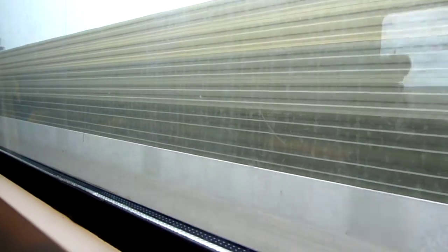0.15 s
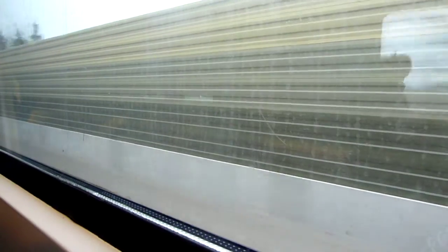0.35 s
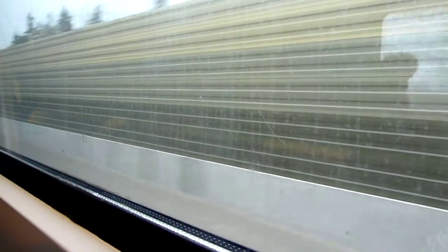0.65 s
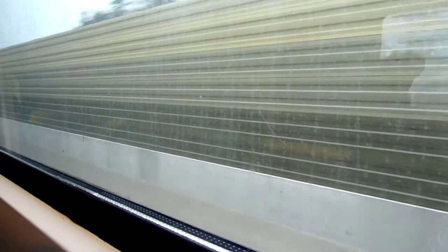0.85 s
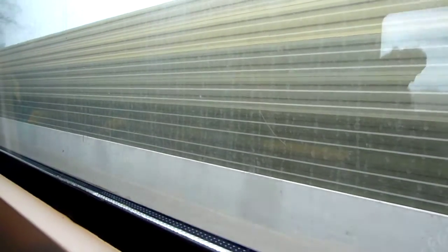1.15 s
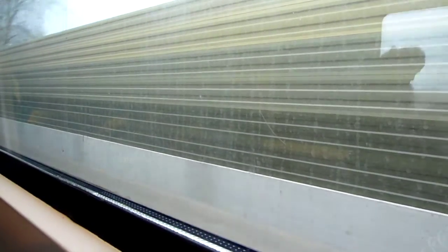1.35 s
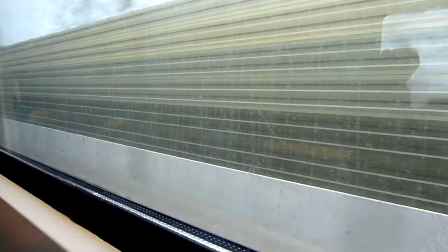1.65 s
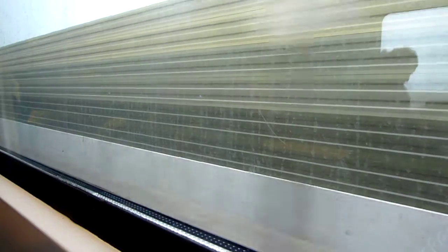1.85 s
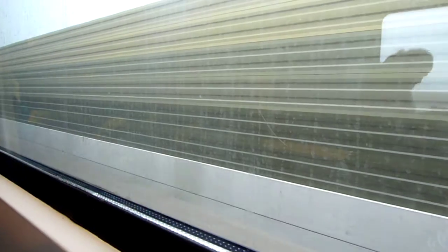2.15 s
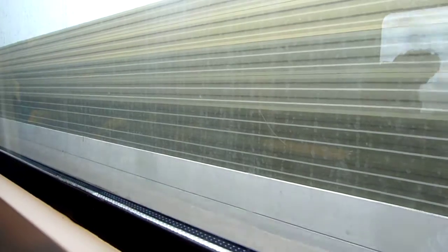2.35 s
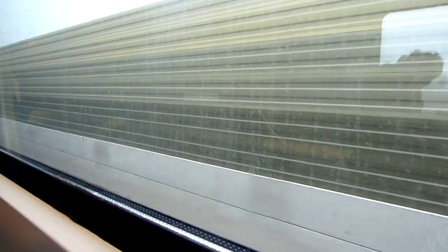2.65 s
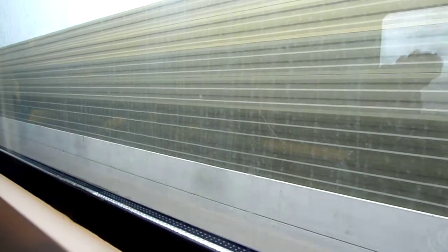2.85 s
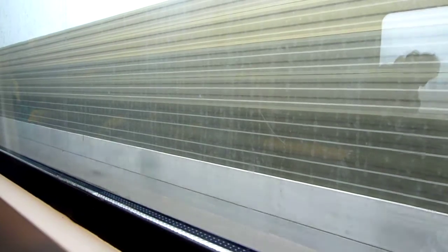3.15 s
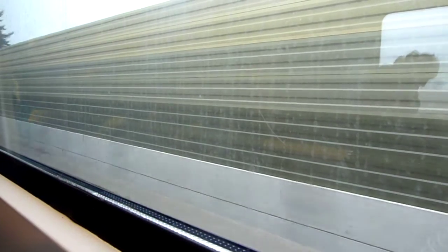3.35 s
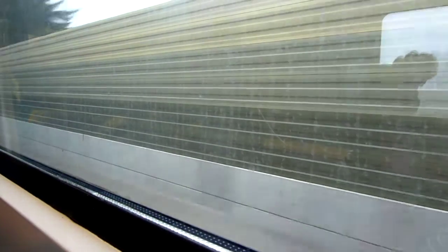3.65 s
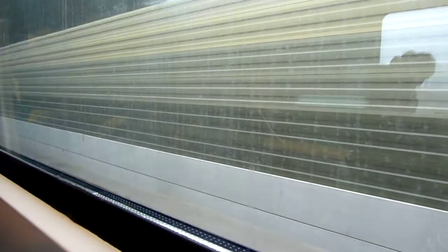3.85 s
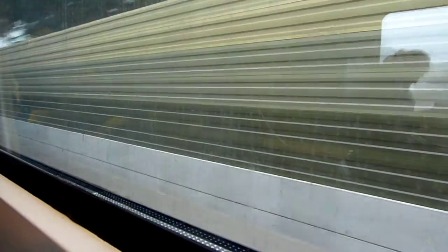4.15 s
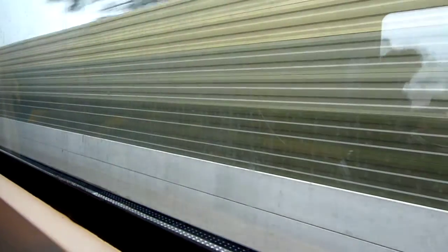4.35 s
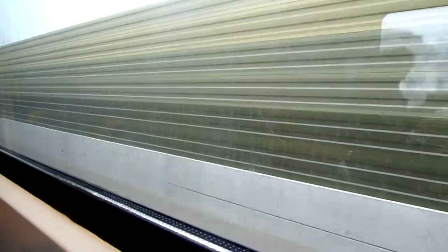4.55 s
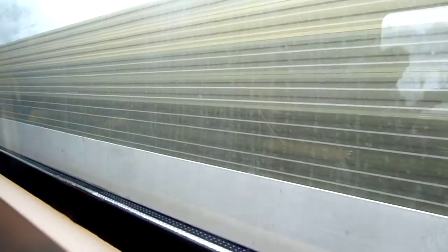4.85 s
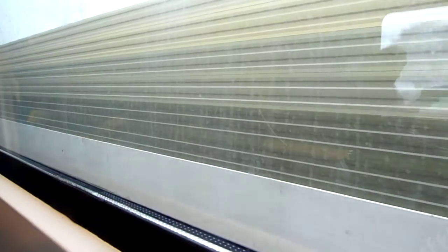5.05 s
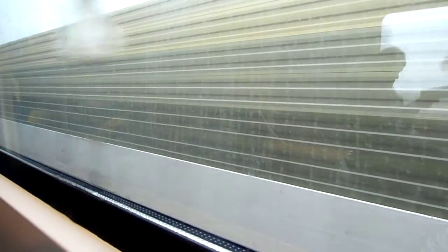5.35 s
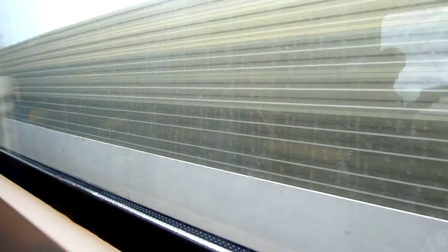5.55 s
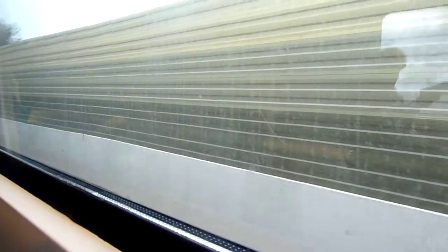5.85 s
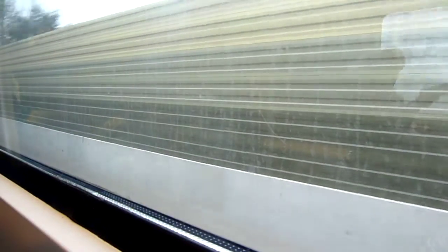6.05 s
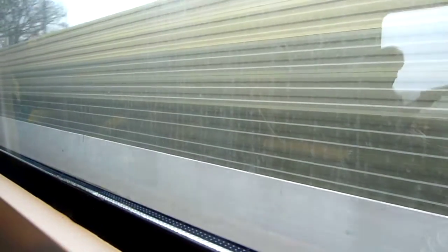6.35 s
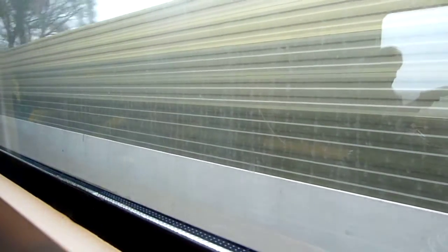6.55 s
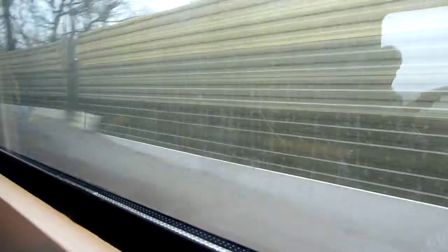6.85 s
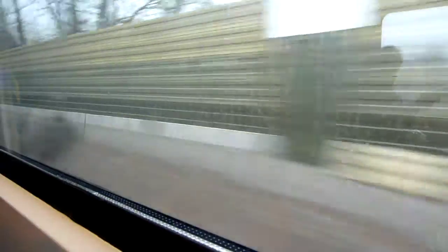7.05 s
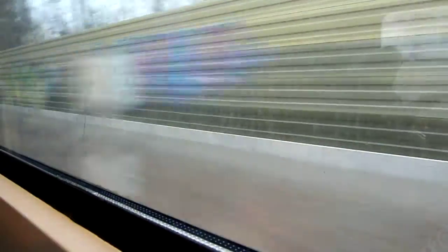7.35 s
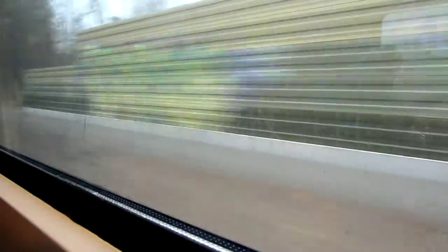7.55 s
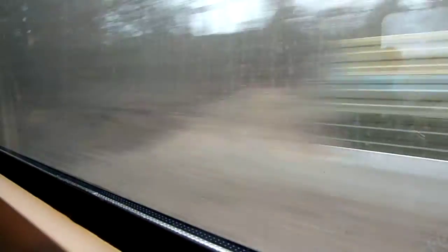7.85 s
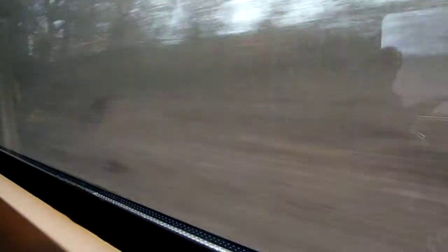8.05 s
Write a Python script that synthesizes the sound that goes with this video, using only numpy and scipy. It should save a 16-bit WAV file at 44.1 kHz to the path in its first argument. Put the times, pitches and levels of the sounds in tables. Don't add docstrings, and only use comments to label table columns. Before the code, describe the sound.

Heard from a window seat inside a fast passenger train: a constant low humming drone from the wheels, floor rumble, and dense rolling roar with faint metallic ringing. Thin air hisses at the window seal. Early on a plastic clip ticks twice, then a tiny metal pull jingles near two seconds as the level briefly dips. Late on, a latch knocks sharply and bounces, followed by light scuffs.

```python
import sys
import numpy as np
from scipy import signal
from scipy.fft import rfft, irfft, next_fast_len
from scipy.io import wavfile

SR = 44100
rng = np.random.default_rng(int(sys.argv[2]) if len(sys.argv) > 2 else 0)


def elevation(decibels):
    levels = np.asarray(decibels, float)
    return 10 ** (levels / 20)


def bounce(signal):
    frames = np.transpose(np.atleast_2d(signal))
    limited = np.clip(frames, -1, 1)
    pcm = np.round(limited * 32767).astype(np.int16)
    wavfile.write(sys.argv[1], SR, pcm)


N = 362061
TIME = np.arange(N) / SR


def rms_one(x):
    return x / np.sqrt(np.mean(x ** 2) + 1e-20)


def drift(rate_hz):
    hop, settle = 40, 3000
    r = np.exp(-2 * np.pi * rate_hz * hop / SR)
    coarse = rng.standard_normal(N // hop + settle + 2)
    slow = signal.lfilter([1], [1, -2 * r, r * r], coarse)[settle:]
    return np.interp(np.arange(N) / hop, np.arange(len(slow)), rms_one(slow - slow.mean()))


def resonance(x, hz, width_hz):
    r = np.exp(-np.pi * width_hz / SR)
    poles = [1, -2 * r * np.cos(2 * np.pi * hz / SR), r * r]
    return signal.lfilter(np.array([1, 0, -1]) * (1 - r * r) / 2, poles, x)


def patchy_noise(spectrum, shared_db, own_db, peaks=(), count=8):
    size = next_fast_len(N)
    hz = np.maximum(np.arange(size // 2 + 1) * SR / size, 1)
    points_hz, points_db = np.transpose(spectrum)
    colour = elevation(np.interp(np.log(hz), np.log(points_hz), points_db, left=-120, right=-120))
    for centre_hz, width_hz, peak_db in peaks:
        colour = colour * elevation(peak_db / (1 + (2 * (hz - centre_hz) / width_hz) ** 2))
    white = rfft(rng.standard_normal(size)) * colour
    place = np.interp(np.log(hz), np.log(points_hz[[0, -1]]), [0, count - 1])
    out = np.zeros(N)
    for k in range(count):
        crossfade = np.clip(1 - abs(place - k), 0, 1)
        band = irfft(white * crossfade, size)[:N]
        out += band * elevation(shared_db + own_db * drift(10))
    return rms_one(out)


def struck(hits, modes, scatter_db):
    at = [round(s * SR) for s, db in hits]
    out = np.zeros(N)
    luck = rng.standard_normal((len(hits), len(modes)))
    for k, (hz, level_db, t60) in enumerate(modes):
        clicks = np.full(N, 1e-18)
        clicks[at] = elevation(np.array(hits)[:, 1] + level_db + scatter_db * luck[:, k])
        r, w = elevation(-60 / (t60 * SR)), 2 * np.pi * hz / SR
        out += (-1) ** k * signal.lfilter([0, np.sin(w)], [1, -2 * r * np.cos(w), r * r], clicks)
    return out


def hum(hz, level_db, wander_db, wander_rad):
    phase = 2 * np.pi * (hz * TIME + rng.random()) + wander_rad * drift(0.54)
    return np.sqrt(2) * elevation(level_db + wander_db * drift(.8)) * np.sin(phase)


def wheels():
    # f/Hz, rms level/dB
    near_wheels = [(47.4, -56), (63.3, -43), (95.05, -40), (111, -38), (126.8, -50), (142.7, -49),
                   (158.5, -46), (174.4, -51), (206.1, -52), (221.6, -56), (268.9, -54), (332.5, -59)]
    # f/Hz, rms level/dB
    far_wheels = [(61.3, -49), (76.6, -47), (92, -44), (107.2, -50), (137.8, -46), (153.1, -44),
                  (168.6, -47), (183.9, -57), (195.9, -53), (229.7, -55)]
    main_hz = 79.05
    soft = softness()
    main_db = -30 - 7.5 * soft
    neighbour_db = -2.5 + 8.5 * soft
    out = hum(main_hz, main_db, 0.42, 0.12)
    for lines, wander_db, wander_rad in ((near_wheels, 1.8, .4), (far_wheels, 2.5, .7)):
        for hz, db in lines:
            closeness = 1 / (1 + ((hz - main_hz) / 27) ** 4)
            out += hum(hz, db - .6 + closeness * neighbour_db, wander_db, wander_rad)
    return out


def softness():
    # start t/s, end t/s, softness 0-1
    soft_bed = [
        (-1.0, .9, .8),
        (4, 5.9, 0.93),
        (7.5, 9.0, .25),
    ]
    change_s = .35
    out = np.zeros(N)
    for start, end, soft in soft_bed:
        entering, leaving = np.tanh((TIME - start) / change_s), np.tanh((TIME - end) / change_s)
        out += soft * (entering - leaving) / 2
    return out


def roughness_db():
    # t/s, level/dB
    rail = [(0.0, -36), (0.39, -34), (0.78, -37), (1.44, -36.5), (1.96, -38), (2.47, -37), (2.97, -39),
            (3.57, -37.5), (3.7, -37), (5.51, -37), (6.61, -38), (8.21, -36.5)]
    # t/s, lift/dB
    patches = [
        (1.3, 1.8),
        (2.2, 1.5),
        (2.55, 0.3),
        (3.5, 0.3),
        (3.87, -2.3),
        (4.16, 0.5),
        (4.99, 1.5),
        (5.56, 1.3),
        (6.01, 3.5),
        (7.25, 1.3),
    ]
    patch_s = .11
    level_db = np.interp(TIME, *np.transpose(rail))
    for s, lift_db in patches:
        level_db += lift_db * np.exp(-((TIME - s) / patch_s) ** 2)
    return level_db


def floor_rumble(swing_db, rail_finish):
    # f/Hz, density/dB per Hz
    rumble_colour = [(12, -33), (22, -18), (45, -11), (58, -7), (75, -1), (100, -2), (120, -4), (140, -4),
                     (170, -4), (190, -9), (270, -8), (370, -13), (480, -18.5), (560, -35)]
    # f/Hz, width/Hz, level/dB
    floor_peaks = [(31, 7.1, 2), (136.6, 6.5, 5.5), (162, 14, 1), (256, 31, 1.5), (279.6, 11, -3.5),
                   (299, 9.6, 3), (310, 15, -3.5), (395.7, 6.3, 3), (460, 6.2, 3), (502, 21, 3)]
    noise = patchy_noise(rumble_colour, 1.2 * rail_finish, 0.32, floor_peaks, count=6)
    return elevation(-31.5 + .9 * swing_db) * noise


def rolling_roar(roar_db, rail_finish):
    # f/Hz, density/dB per Hz
    roar_colour = [(300, -22.5), (520, -5), (800, -3.5), (1150, -3.5), (1700, -4), (2300, -4.5),
                   (2900, -10.5), (3500, -12), (4200, -22.5)]
    # f/Hz, width/Hz, level/dB
    roar_peaks = [(552, 36, -1.5), (616, 22, 3), (776, 11, 3), (1395, 200, 6), (1607, 60, 3),
                  (2064, 180, 3), (2170, 74, 0.5), (2365, 50, 1.5), (2440, 90, -1), (2720, 55, 3.5),
                  (2880, 60, 3)]
    noise = patchy_noise(roar_colour, 0.71 * rail_finish, .8, roar_peaks, count=6)
    return elevation(roar_db - 1.0) * (noise + elevation(38.5) * rings())


def rings():
    # f/Hz, width/Hz, rms level/dB
    ring_modes = [(1582, 4, -59), (2068, 14, -54.5), (2116.3, 5, -54.5), (2132, 5, -59), (2284, 6, -61),
                  (2316, 4, -65), (2535, 5, -65), (2631, 6, -63), (2672, 10, -64), (2791, 6, -65),
                  (4574, 8, -77), (4790, 5, -76), (5708, 10, -81), (6728, 10, -86)]
    white = rng.standard_normal(N + SR)
    out = np.zeros(N)
    for k, (hz, width_hz, db) in enumerate(ring_modes):
        ring = rms_one(resonance(white, hz, width_hz)[SR:])
        out += (-1) ** k * elevation(db + 2.2 + 1.5 * drift(2.5)) * ring
    return out


def scuffs():
    # t/s, peak level/dB, rubbing time/s, low f/Hz, high f/Hz
    rubs = [(.283, -51, .02, 4800, 6800), (.636, -42.5, .025, 2600, 5400), (.811, -47, .012, 2800, 5600),
            (.981, -49, .03, 2600, 5000), (1.430, -49, .02, 2800, 5500), (1.935, -48, .032, 3000, 7600),
            (1.943, -52, .03, 5960, 6120), (1.936, -53, .03, 6640, 6800), (5.697, -49, .022, 3300, 6500),
            (6.8125, -35, .018, 1200, 3000), (6.8125, -46.5, .008, 3400, 6500),
            (6.865, -41, .027, 900, 3000), (7.174, -41.5, .034, 1800, 5800), (7.501, -49, .008, 3500, 6800)]
    length = SR // 4
    t = TIME[:length]
    white = rng.standard_normal((len(rubs), length))
    slips = rng.standard_normal((len(rubs), length // 90 + 1))
    slips = np.repeat(slips, 90, axis=1)[:, :length]
    out = np.zeros(N)
    for (s, peak_db, rubbing, low_hz, high_hz), noise in zip(rubs, white * elevation(2.2 * slips)):
        tail_t60 = min(690 / np.sqrt(low_hz * high_hz), 0.21)
        onset = np.minimum(t / (0.32 * rubbing), 1)
        tail = elevation(-60 * np.maximum(t - rubbing, 0) / tail_t60)
        band = signal.butter(2, [low_hz, high_hz], "band", fs=SR, output="sos")
        rub = rms_one(signal.sosfilt(band, noise))
        at = round(s * SR)
        out[at:at + length] += elevation(peak_db - 1.7) * onset * tail * rub
    return out


def clip_ticks():
    # t/s, peak level/dB
    ticks = [
        (.8125, -41),
        (.8205, -42),
    ]
    # f/Hz, level/dB, t60/s
    clip_modes = [(3580, -4, .05), (4780, 0, .06), (5750, -8, .03)]
    return struck(ticks, clip_modes, 1.7)


def pull_jingle():
    # t/s, peak level/dB
    jingles = [
        (1.938, -58),
        (1.951, -57),
        (1.959, -55),
        (1.966, -56),
        (1.991, -53),
        (2.024, -58),
        (2.043, -61),
        (2.068, -55),
    ]
    # f/Hz, level/dB, t60/s
    pull_modes = [(5120, -7, .05), (5640, -8, .045), (6045, 0, .085), (6725, 1, .07)]
    return struck(jingles, pull_modes, 3.5)


def latch_knocks():
    # t/s, peak level/dB
    knocks = [
        (6.8130, -34),
        (6.8163, -27.5),
        (6.8232, -33),
        (6.8285, -36),
    ]
    # f/Hz, level/dB, t60/s
    latch_modes = [(1760, -5, .04), (2220, -6, .03), (2520, 0, .045), (2970, -5, .03), (3390, -11, .04),
                   (4230, -19, .04), (4950, -11, .03), (5490, -12, .035), (6650, -16, .025)]
    return struck(knocks, latch_modes, 1.7)


def air_hiss(swing_db, rail_finish):
    # f/Hz, density/dB per Hz
    hiss_colour = [(2600, -11.5), (3600, 4), (4300, 1), (5000, -1.5), (6000, -5.5), (7000, -11.5),
                   (9000, -20.5)]
    # t/s, level/dB
    draught = [(0.0, -51.5), (0.32, -52), (1.99, -54), (2.35, -53.5), (2.93, -55), (3.31, -53.5),
               (5.63, -54), (6.42, -55), (8.21, -52.5)]
    draught_db = np.interp(TIME, *np.transpose(draught))
    noise = patchy_noise(hiss_colour, 0.81 * rail_finish, 0.69, count=4)
    return elevation(draught_db + 1 + .4 * swing_db) * noise


def scene():
    roar_db = roughness_db()
    swing_db = roar_db - roar_db.mean()
    rail_finish = drift(6.4)
    running = wheels() + floor_rumble(swing_db, rail_finish) + rolling_roar(roar_db, rail_finish)
    fittings = scuffs() + clip_ticks() + pull_jingle() + latch_knocks()
    return (running + fittings + air_hiss(swing_db, rail_finish))[None]


def band_limit(x):
    return signal.sosfilt(signal.butter(12, 9000, fs=SR, output="sos"), x)


def record(dry):
    # f/Hz, level/dB
    converter = [(5500, 0.5), (6500, -3.5), (7000, -8.5), (7350, -16.5), (7650, -28), (8100, -50),
                 (8600, -33), (9300, -60)]
    duck_s, depth_db, attack_s, recovery_s = 1.969, -5, 0.0046, 0.1
    since = TIME - duck_s
    recovery = np.exp(-(np.maximum(since, 0) / recovery_s) ** 1.8)
    duck_db = depth_db * np.clip(since / attack_s, 0, 1) * recovery
    size = next_fast_len(N)
    hz = np.arange(size // 2 + 1) * SR / size
    top_cut = elevation(np.interp(hz, *np.transpose(converter)))
    taken = irfft(rfft(dry * elevation(duck_db), size) * top_cut, size)[:, :N]
    return band_limit(taken)


dry = scene()
out = record(dry)
bounce(out)
```